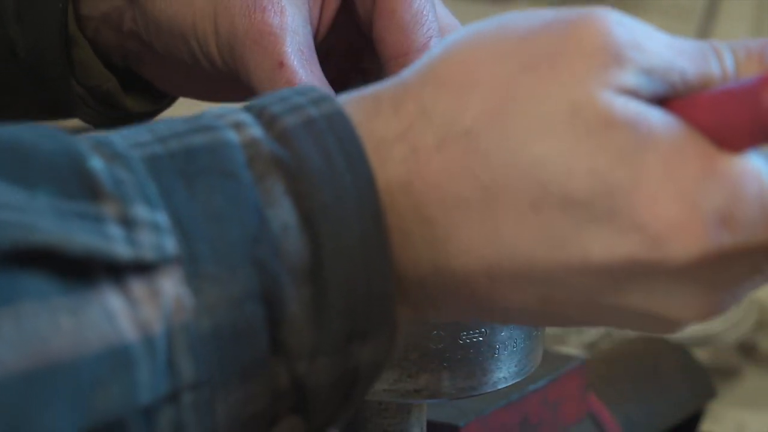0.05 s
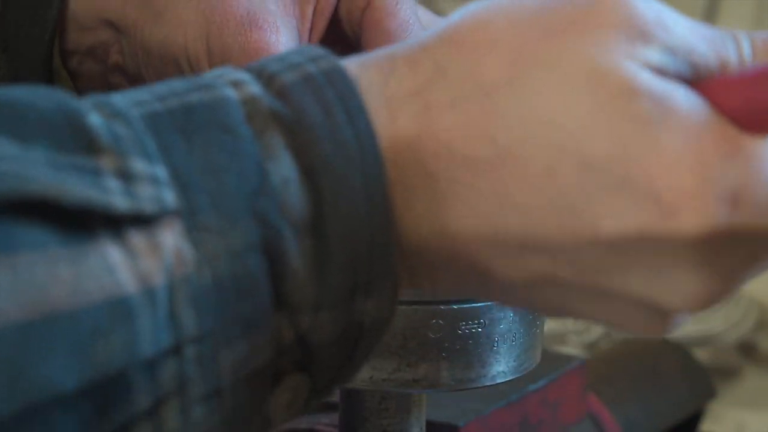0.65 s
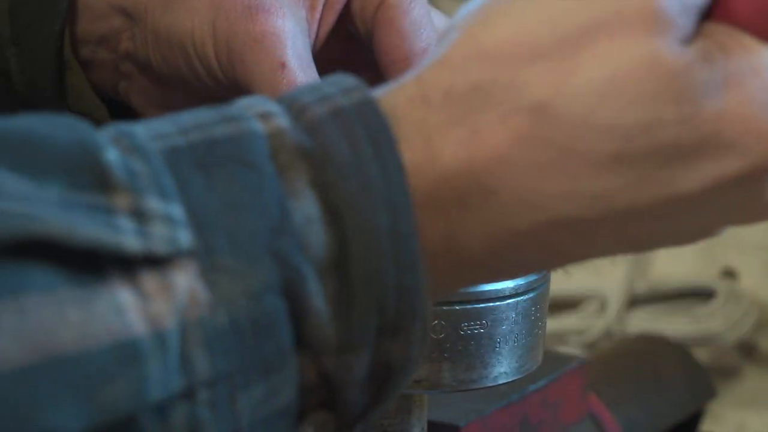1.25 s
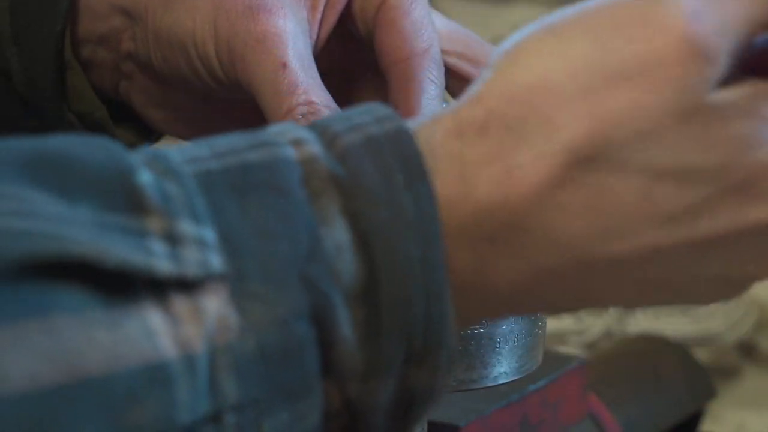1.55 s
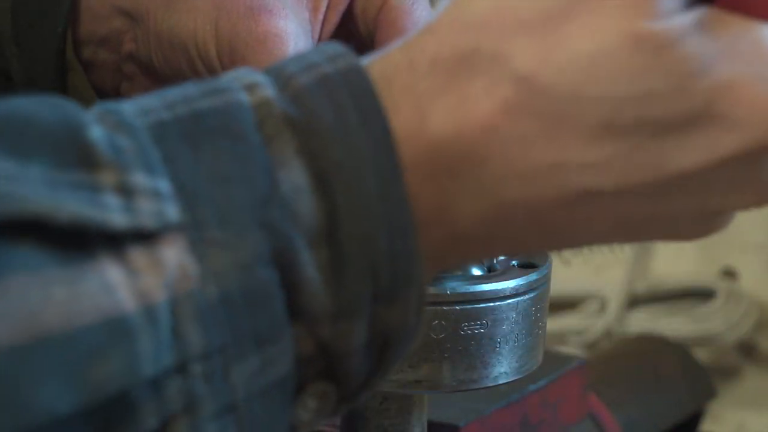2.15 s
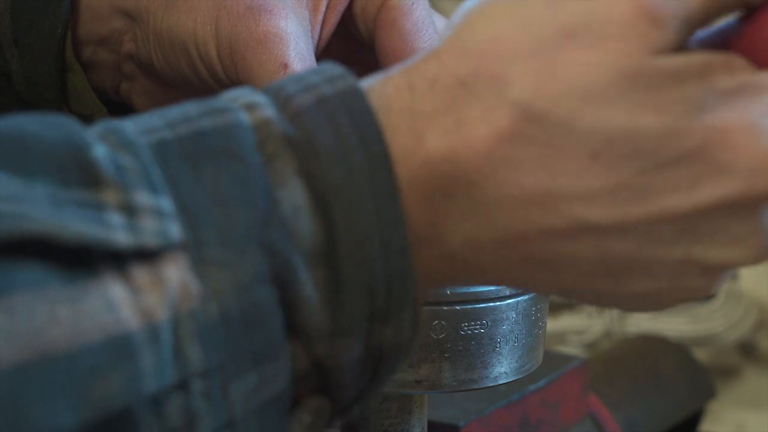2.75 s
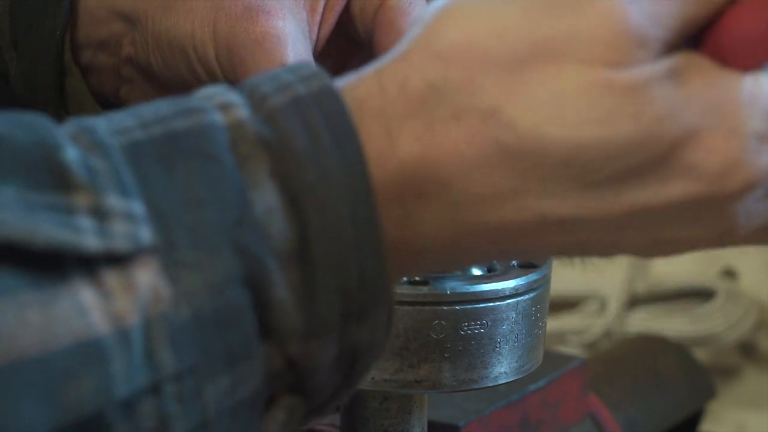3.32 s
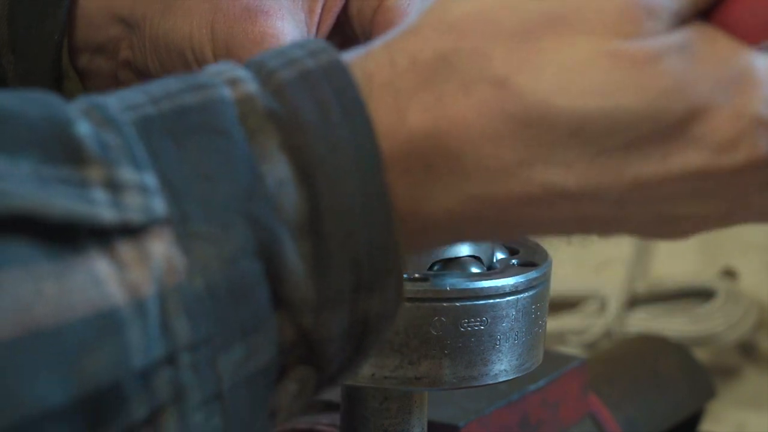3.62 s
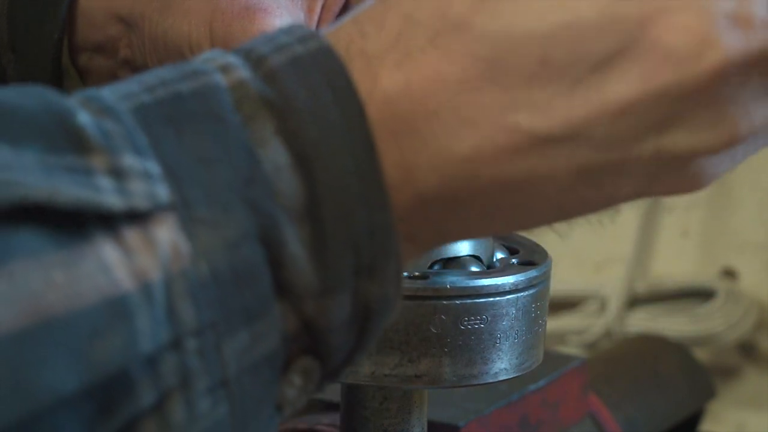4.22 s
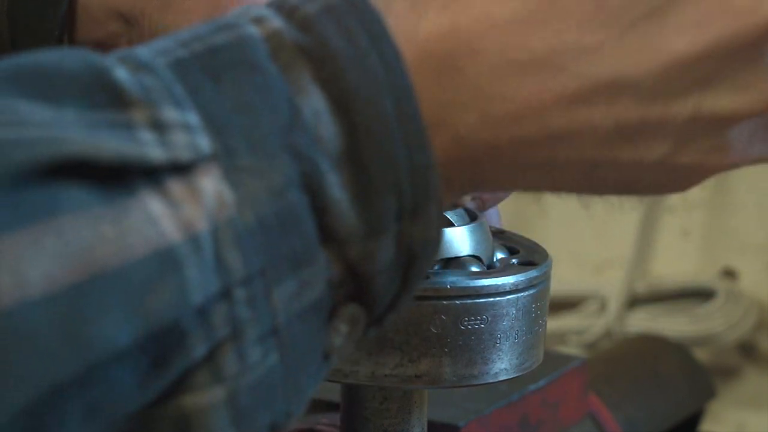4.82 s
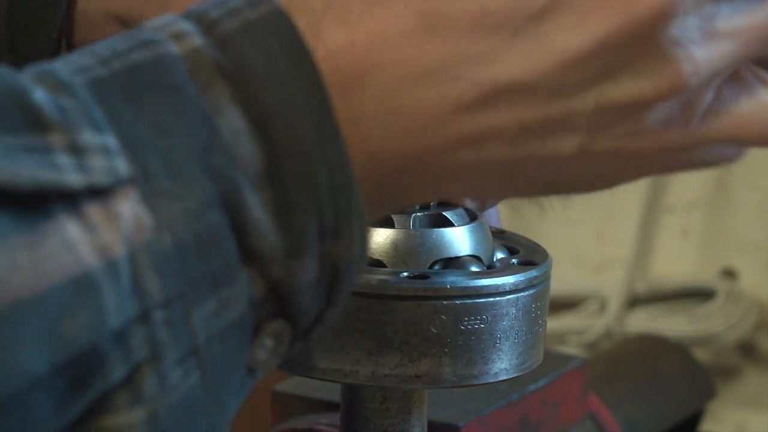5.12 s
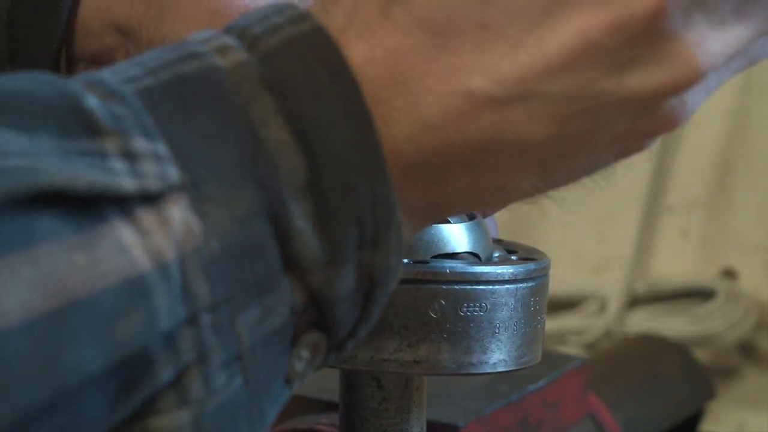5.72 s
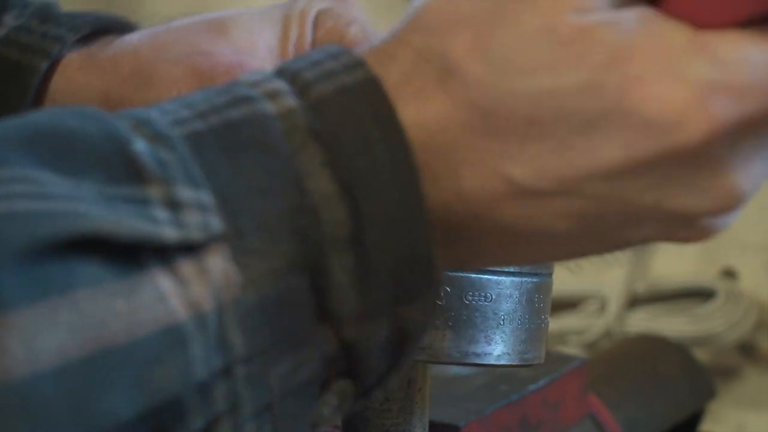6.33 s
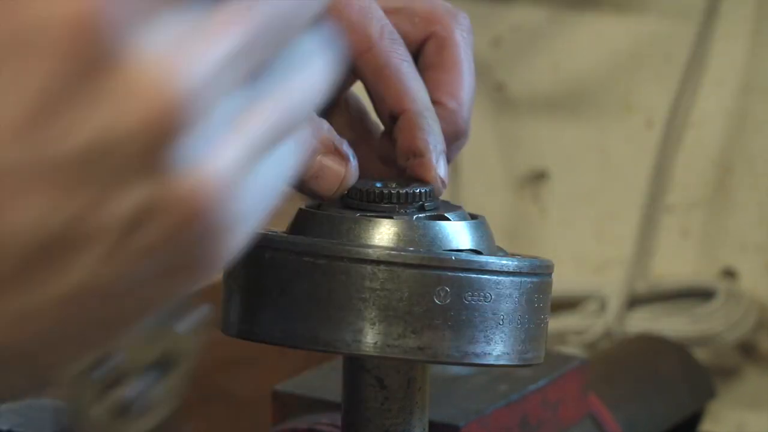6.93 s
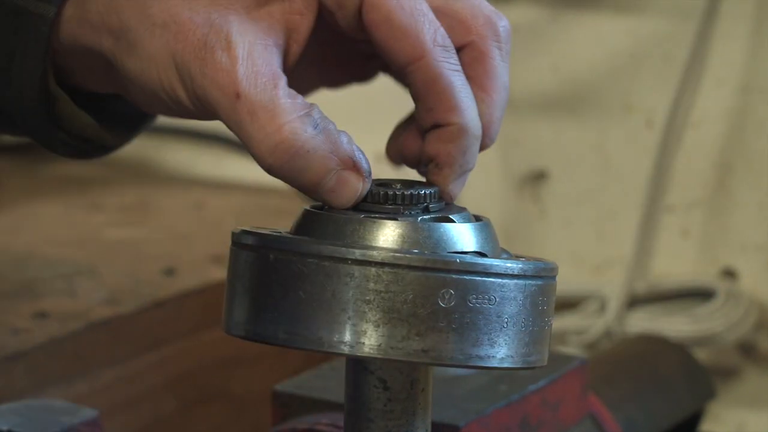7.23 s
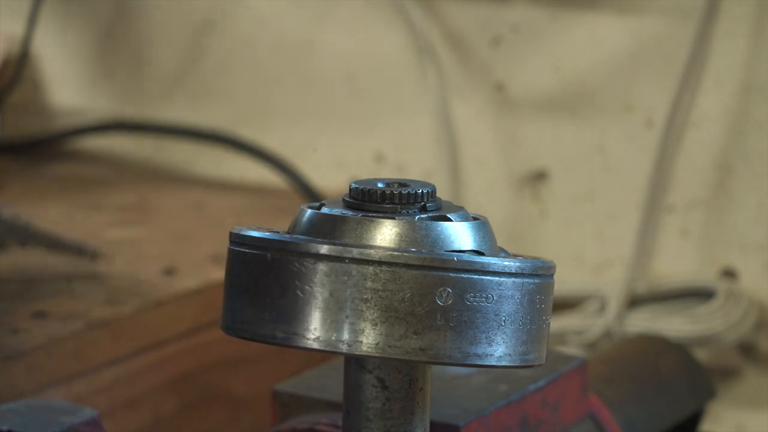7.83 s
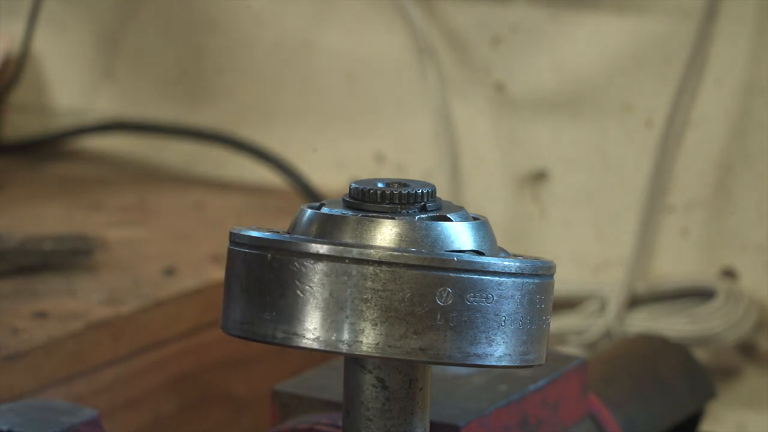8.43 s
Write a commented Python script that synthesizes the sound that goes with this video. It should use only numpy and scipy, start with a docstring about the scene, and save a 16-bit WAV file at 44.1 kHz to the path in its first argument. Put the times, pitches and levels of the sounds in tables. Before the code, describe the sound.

Pliers work small steel clips onto a metal axle, their tips clicking, slipping and ticking at irregular intervals. A clip snaps free with a brief high ring near the start, and a second snaps louder later on. A sleeve then swishes and the pliers clatter down on a wooden bench. The sounds are close, in a small quiet workshop with a faint electrical hum.

```python
"""Circlip pliers at a workbench

Pliers work small steel circlips onto the axle of a hub held in a vice. The tips click and slip on the
steel; twice a circlip snaps free and rings. A sleeve swishes as the arm draws back, and the pliers
clatter down on the wooden bench. A faint hum fills the quiet workshop throughout."""
import sys
import numpy as np
from scipy import signal
from scipy.io import wavfile
from scipy.ndimage import uniform_filter1d

SR = 44100
rng = np.random.default_rng(int(sys.argv[2]) if len(sys.argv) > 2 else 0)


def int16_out(signal):
    """Quantize to a 16-bit WAV file."""
    q = np.round(np.clip(np.atleast_2d(signal).T, -1, 1) * 32767)
    wavfile.write(sys.argv[1], SR, q.astype(np.int16))


N = 377937


def amp(db):
    """Decibels to gain."""
    return 10 ** (np.asarray(db) / 20)


def unit_rms(x):
    """Scales to rms 1."""
    return x / np.sqrt(np.mean(x ** 2) + 1e-20)


def lookup(table, hz):
    """Interpolates a table over log frequency."""
    f, value = np.transpose(table)
    return np.interp(np.log(hz + 1), np.log(f), value)


def add(mix, start_s, sound):
    """Mixes a sound in at start_s."""
    part = mix[max(round(start_s * SR), 0):][:len(sound)]
    part += sound[:len(part)]


def colour(x, spectrum, peaks=(), size=4096):
    """Minimum-phase filter: a broad spectrum plus peaks (f/Hz, width/Hz, height/dB)."""
    hz = abs(np.fft.fftfreq(size, 1 / SR))
    peaks_db = sum(height / (1 + (2 * (hz - f) / width) ** 2) for f, width, height in peaks)
    log_gain = np.log(amp(lookup(spectrum, hz) + peaks_db))
    taps = np.fft.ifft(np.exp(signal.hilbert(log_gain).conj())).real
    return signal.oaconvolve(x, taps[:size // 2])[:len(x)]


def blow_level(x, db):
    """Gives a blow the energy of 10 ms at rms level db."""
    return amp(db) * x * np.sqrt(SR / 100 / np.sum(x ** 2))


def part_level(blow_db, base_db, growth, usual_db=-44.5):
    """Level of one part of a blow: base_db at usual_db, plus growth dB for each dB above."""
    return base_db + growth * (blow_db - usual_db)


def burst(db, spectrum, peaks=(), *, rise_s, t60_s, size=16384):
    """Many close modes, struck: noise that swells quickly and dies away."""
    t = np.arange(size) / SR
    envelope = (1 - np.exp(-t / rise_s)) * amp(-60 * t / t60_s)
    noise = rng.choice([-1., 1.], size)
    return blow_level(colour(noise * envelope, spectrum, peaks), db)


# air spectrum: f/Hz, level/dB
AIR = [(25, -21.5), (50, -4), (110, 2), (200, -5), (320, -5.5), (600, -9.5), (1000, -12.5), (2000, -18.5),
       (4000, -20), (8000, -23), (15000, -24)]
# mains partials: f/Hz, level/dB
HUM = [(60, -81.5), (120, -68.5)]

def background(air_db=-60.5, air_waver_db=.5, hum_waver_db=2.1):
    """Still air and a faint mains hum, wavering together."""
    t = np.arange(N) / SR
    waver = unit_rms(uniform_filter1d(uniform_filter1d(rng.standard_normal(N), 6000), 6000))
    hum = sum(amp(db) * np.sqrt(2) * np.sin(2 * np.pi * (hz * t + rng.random())) for hz, db in HUM)
    air = unit_rms(colour(rng.standard_normal(N), AIR))
    return air * amp(air_db + air_waver_db * waver) + hum * amp(hum_waver_db * waver)


# room decay: f/Hz, t60/s
TAIL_T60 = [(100, .42), (260, .38), (700, .34), (1800, .37), (4500, .44), (9000, .37), (12000, .28),
            (15000, .22)]
# tail spectrum: f/Hz, level/dB
TAIL_COLOUR = [(100, 7), (220, 4.5), (600, -0.5), (2000, -2.5), (4500, -4), (9000, -6.5), (16000, -5.5)]

def room_response(early_db=-12.5, early_t60_s=.12, echoes_per_s=4000, tail_db=-17.5):
    """Quick reflections off bench and wall, then the tail of a small room."""
    t = np.arange(SR) / SR
    echoes = rng.standard_normal(SR) * (rng.random(SR) < echoes_per_s / SR)
    early = echoes * (t > .0045) * amp(-60 * t / early_t60_s)
    diffuse = rng.standard_normal(SR) * (1 - np.exp(-t / .028))
    hz, age_s, bins = signal.stft(diffuse, SR, nperseg=256)
    decay_db = lookup(TAIL_COLOUR, hz)[:, None] - 60 * age_s / lookup(TAIL_T60, hz)[:, None]
    tail = signal.istft(bins * amp(decay_db), SR, nperseg=256)[1][:SR]
    return amp(early_db) * early / np.linalg.norm(early) + amp(tail_db) * tail / np.linalg.norm(tail)


def workshop(x, count=4):
    """Room responses crossfade in a 1 s cycle, so each click's tail has a slightly different colour."""
    t = np.arange(N) / SR
    shares = [np.maximum(np.cos(2 * np.pi * (t - k / count)), 0) for k in range(count)]
    return x + sum(signal.oaconvolve(x * share, room_response())[:N] for share in shares)


# strokes of sleeve, fingers and sliding pliers: peak t/s, swell/s, fade/s, rustle/dB, swish/dB
STROKES = [(1.75, 1, 0.7, -63, -67), (2.74, 0.37, .12, -63, -61), (4.76, 0.45, 0.13, -59.5, -61),
           (6.93, 0.59, 1, -53.5, -57.5), (7.333, .03, 0.022, -49, -48.5), (7.448, 0.22, 0.33, -48.5, -49),
           (7.56, 0.022, 0.019, -44.5, -74), (7.606, 0.0052, 0.041, -35, -43),
           (7.685, 0.12, 0.072, -37.5, -32.5), (7.84, 0.53, 0.55, -51.5, -53.5)]
# low and high friction spectra: f/Hz, level/dB
RUSTLE = [(100, -14), (230, -6), (370, 2), (800, -0.5), (1500, -1), (2200, -5.5), (4000, -21.5)]
SWISH = [(1300, -11.5), (2300, -8.5), (3300, -4.5), (4300, -6.5), (5200, -6), (6800, -7), (9200, -19.5),
         (15000, -29)]

def rubbing(depth_db=18.5, rustle_trim_db=-1, swish_trim_db=-3.5, fizz_db=-5, knee_db=-53,
            catches_per_s=240):
    """Fibres and skin catch and let go; strokes swell and fade, their fizz levelling off at a knee."""
    t = np.arange(N) / SR
    catches = 3 * rng.standard_normal(N) * (rng.random(N) < catches_per_s / SR)
    rustle = unit_rms(colour(rng.standard_normal(N) + catches, RUSTLE, [(774, 820, 2.8)]))
    swish = unit_rms(colour(rng.standard_normal(N) + catches, SWISH, [(4270, 800, 4.5)]))
    fizz = unit_rms(np.diff(rng.standard_normal(N) + catches, prepend=0))
    rustle_power, swish_power = np.zeros(N), np.zeros(N)
    for peak_s, swell_s, fade_s, rustle_db, swish_db in STROKES:
        stroke = amp(-depth_db * np.maximum((peak_s - t) / swell_s, (t - peak_s) / fade_s))
        rustle_power += (stroke * amp(rustle_db + rustle_trim_db)) ** 2
        swish_power += (stroke * amp(swish_db + swish_trim_db)) ** 2
    swish_gain = np.sqrt(swish_power)
    fizz_gain = amp(fizz_db) * np.minimum(swish_gain, amp(knee_db))
    return rustle * np.sqrt(rustle_power) + swish * swish_gain + fizz * fizz_gain


# fingertips on the hub: t/s, length/s, level/dB, starting f/Hz
DRAGS = [(6.905, 0.064, -46, 584), (6.988, .045, -50.5, 685)]

def finger_drags(glide_hz_per_s=4400, width_hz=260):
    """Skin sliding on steel gives a soft, fuzzy, rising squeak."""
    out = np.zeros(N)
    pole = np.exp(-np.pi * width_hz / SR)
    for at_s, length_s, db, hz in DRAGS:
        t = np.arange(0, length_s, 1 / SR)
        noise = rng.standard_normal((SR, 2)) @ [1, 1j]
        fuzz = signal.lfilter([1], [1, -2 * pole, pole * pole], noise)[-len(t):]
        phase = 2 * np.pi * np.cumsum(hz + glide_hz_per_s * t) / SR
        squeak = unit_rms((fuzz * np.exp(1j * phase)).real)
        add(out, at_s, amp(db) * squeak * np.sin(np.pi * t / length_s))
    return out


# spectra of wooden knock, low boom and steel clack, tick and shimmer: f/Hz, level/dB
WOOD = [(120, -21.5), (300, 4.5), (520, 8.5), (900, 9.5), (1450, 5.5), (1750, -3.5), (2400, -5),
        (4500, -41.5)]
BOOM = [(45, -38.5), (76, -11.5), (105, 4.5), (190, 1), (290, -4), (400, -4), (650, -35)]
CLACK = [(1100, -28), (2100, -5), (3200, -2.5), (4500, -1), (5800, 0), (6600, -5), (8800, -30)]
TICK = [(4000, -20.5), (6400, 4.5), (8600, 8), (10600, 3.5), (13200, 3), (15600, -7.5), (17000, -19)]
SHIMMER = [(700, -37.5), (1600, -9.5), (2400, -10.5), (3200, 0.5), (4100, -1.5), (6400, -9.5), (9100, -8),
           (11200, -12), (15600, -16.5)]
# resonances of the bench top, and of pliers and hub: f/Hz, width/Hz, height/dB
BENCH_MODES = [(106, 20, 8), (227, 25, 6), (476, 30, 6), (592, 25, 5), (635, 25, 6), (812, 55, 7),
               (916, 45, 5), (1017, 35, 7), (1210, 30, 5), (1360, 140, 4)]
STEEL_MODES = [(1720, 450, 5), (3900, 500, 2.5), (5000, 600, 3.5), (5600, 600, 4), (6850, 500, 2.5),
               (8050, 550, 3), (9350, 600, 5.5), (11750, 900, 3.5)]
# pliers landing and rocking: t/s, wood/dB, thump/dB, clack/dB
KNOCKS = [(7.748, -46, -44, -52), (7.9014, -22.5, -27, -32.5), (8.0352, -21.5, -39, -43.5),
          (8.0455, -20, -26, -35), (8.0692, -28.5, -57, -52), (8.1397, -13.5, -29.5, -31),
          (8.1482, -30, -27, -34.5), (8.2909, -22, -68, -68), (8.3562, -37, -57, -52.5),
          (8.3935, -36, -34, -69), (8.4131, -33.5, -30, -50), (8.4856, -25, -37, -48.5),
          (8.4959, -49, -34, -42)]

def bench_knocks(shudder_db=-7, jaw_ring_db=-11):
    """The pliers drum on the bench top, which shudders on; their jaws rattle and ring."""
    out = np.zeros(N)
    for at_s, wood_db, thump_db, clack_db in KNOCKS:
        tick_db = part_level(clack_db, base_db=-51.5, growth=1.63)
        add(out, at_s, burst(thump_db, BOOM, BENCH_MODES, rise_s=.0013, t60_s=.15))
        add(out, at_s, burst(wood_db, WOOD, BENCH_MODES, rise_s=.00065, t60_s=.042))
        add(out, at_s, burst(wood_db + shudder_db, WOOD, BENCH_MODES, rise_s=.011, t60_s=.41))
        add(out, at_s, burst(clack_db, CLACK, [(2800, 330, 8.5)], rise_s=.00061, t60_s=.02))
        add(out, at_s, burst(clack_db + jaw_ring_db, SHIMMER, rise_s=.0066, t60_s=.32))
        add(out, at_s, burst(tick_db, TICK, STEEL_MODES, rise_s=.0006, t60_s=.016))
    return out


# dull body of a blow on steel: f/Hz, level/dB
BODY = [(160, -24), (370, -1), (850, 0), (1350, -2.5), (1850, -7), (2800, -12), (4500, -32)]
# tips slipping on circlip and axle: t/s, body/dB, clack over body/dB, contact f/Hz
SLIPS = [(0.394, -51, -8, 3950), (0.872, -54.5, 13, 6340), (0.9179, -63.5, 15, 5340),
         (0.9976, -65, 7.5, 5150), (1.2495, -41.5, 1, 5440), (1.2604, -46, -0.5, 9000),
         (1.339, -43.5, 10.5, 8100), (1.3919, -45.5, 1.5, 5110), (1.5442, -59, 9, 7870),
         (1.5965, -44, 6, 1810), (1.7327, -35.5, -5, 1800), (1.7418, -43.5, 4, 1600),
         (1.852, -54.5, 3, 7670), (1.9596, -46.5, 5.5, 5650), (2.1561, -44.5, 3, 8140),
         (2.255, -53, -9, 1620), (2.562, -45.5, 9.5, 7340), (2.6557, -59, 8.5, 3560),
         (2.8209, -38, 1.5, 9300), (2.8291, -35.5, 0.5, 1850), (3.397, -55, -5.5, 1410),
         (3.572, -52, -6.5, 1090), (3.6159, -38, -1, 3960), (3.862, -54.5, -3, 9300), (3.896, -40, 1, 3270),
         (4.1263, -49, -19, 1130), (4.3463, -55, -6.5, 9320), (4.3768, -54.5, 2.5, 2770),
         (5.53, -38.5, -15.5, 1730), (5.604, -31, -9.5, 1580), (5.764, -69, 17, 14000),
         (5.9143, -36.5, -14, 1060), (5.982, -47, -13, 1750), (6.1113, -43.5, -13, 930),
         (6.1244, -46, -7.5, 940), (6.393, -55, 10.5, 6000), (6.5584, -49.5, 14.5, 11510)]

def tip_clicks(lead_s=.0089, scrape_db=-22.5, contact_q=5, contact_db=6.5):
    """Each slip scrapes, ticks and rings the pliers at its own pitch; a low room boom swells after."""
    out = np.zeros(N)
    for at_s, body_db, bright_db, contact_hz in SLIPS:
        clack_db = body_db + bright_db
        boom_db = part_level(body_db, base_db=-44.5, growth=.51)  # grows less than the click
        tick_db = part_level(clack_db, base_db=-45, growth=1.3)  # harder contacts are brighter
        # the contact point decides how each resonance answers
        modes = [(hz * rng.uniform(.96, 1.04), width_hz, db + 1.5 * rng.standard_normal())
                 for hz, width_hz, db in STEEL_MODES]
        modes.append((contact_hz, contact_hz / contact_q, contact_db))
        scrape = burst(body_db + scrape_db, SHIMMER, modes, rise_s=.0062, t60_s=.05, size=4096)
        add(out, at_s - lead_s, scrape)
        add(out, at_s, burst(boom_db, BOOM, rise_s=.0091, t60_s=.16))
        add(out, at_s, burst(body_db, BODY, modes, rise_s=.00032, t60_s=.065, size=4096))
        add(out, at_s, burst(clack_db, CLACK, modes, rise_s=.00012, t60_s=.026, size=4096))
        add(out, at_s, burst(tick_db, TICK, modes, rise_s=.00018, t60_s=.026, size=4096))
    return out


def tip_skids(count=3, within_s=.11, below_db=14, spread_db=5, boom_offset_db=1.5):
    """After a slip the tips skid on in tiny ticks, each with a faint room boom."""
    out = np.zeros(N)
    for slip_s, body_db, bright_db, _ in SLIPS:
        for wait, strength in rng.random((count, 2)):
            at_s = slip_s + within_s * wait
            db = body_db + min(bright_db, 0) - below_db + spread_db * np.log(strength)
            add(out, at_s, burst(db, TICK, STEEL_MODES, rise_s=.0001, t60_s=.012, size=2048))
            add(out, at_s, burst(db + boom_offset_db, BOOM, rise_s=.012, t60_s=.14, size=8192))
    return out


# modes of each circlip: f/Hz, level/dB, t60/s
FIRST_RING = [(3625, -5, .42), (3772, -2, .48), (3805, -5, .45), (4454, -4, .4), (5355, -4, .33),
              (6661, -6, .33), (7962, -4, .3), (9345, -1, .33), (10200, -4, .34), (11720, -8, .26)]
SECOND_RING = [(3850, -8, .45), (3934, -10, .47), (5009, -3, .44), (5050, -5, .44), (5073, -4, .44),
               (5100, -4, .44), (5145, -4, .4), (5215, -6, .4), (5371, -3, .33), (5417, 0, .35),
               (5466, -3, .33), (5640, -11, .4), (9426, -16, .3), (11750, -12, .26)]

def circlip_ring(modes, db, max_split_hz=20, size=32768):
    """Free modes of a circlip; its gap splits each into a close, beating pair."""
    t = np.arange(size) / SR
    out = np.zeros(size)
    for hz, mode_db, t60_s in modes:
        phase, twin_phase = 2 * np.pi * rng.random(2)
        twin_hz = hz + rng.uniform(-max_split_hz, max_split_hz)
        pair = np.sin(2 * np.pi * hz * t + phase) + 1.1 * np.sin(2 * np.pi * twin_hz * t + twin_phase)
        out += amp(mode_db - 60 * t / t60_s) * pair
    return blow_level(out, db)


# circlip striking the axle: t/s, clack/dB, tick/dB, hub peak height/dB
STRIKES = [(0.6426, -22, -17.5, 1.5), (0.6452, -22.5, -17.5, 4), (6.1365, -23, -16.5, 1.5),
           (6.141, -10.5, -25.5, 8.5), (6.1446, -20, -38.5, 15.5), (6.1806, -33, -41.5, 17)]
# ring-out of each snap: t/s, room boom/dB, circlip ring/dB, hub shimmer/dB, hub peak height/dB
RING_OUTS = [(0.643, -34, -32.5, -31.5, -6), (6.141, -36.5, -19, -22.5, 7)]

def circlip_snaps(boom_hz=200, hub_hz=5280, body_offset_db=-15.5):
    """A circlip springs off the tips and hits the axle; the room booms, circlip and hub ring on."""
    out = np.zeros(N)
    for at_s, clack_db, tick_db, hub_db in STRIKES:
        add(out, at_s, burst(max(clack_db, tick_db) + body_offset_db, BODY, rise_s=.0001, t60_s=.03))
        add(out, at_s, burst(clack_db, CLACK, [(hub_hz, 1300, hub_db)], rise_s=.00017, t60_s=.0054))
        add(out, at_s, burst(tick_db, TICK, [(10100, 850, 3.2)], rise_s=.00051, t60_s=.0096))
    for (at_s, boom_db, ring_db, shimmer_db, hub_db), modes in zip(RING_OUTS, (FIRST_RING, SECOND_RING)):
        add(out, at_s, burst(boom_db, BOOM, [(boom_hz, 70, 14)], rise_s=.018, t60_s=.17))
        add(out, at_s, circlip_ring(modes, ring_db))
        hub_peak = [(hub_hz, 380, hub_db)]
        add(out, at_s, burst(shimmer_db, SHIMMER, hub_peak, rise_s=.0024, t60_s=.42, size=32768))
    return out


def scene():
    """The handwork in the room, over air and hum; mono."""
    handwork = tip_clicks() + tip_skids() + circlip_snaps() + bench_knocks() + rubbing() + finger_drags()
    return (workshop(handwork) + background())[None]


def record(dry, ceiling=.85, cutoff_hz=16000):
    """The hardest snaps overload at the ceiling; a low-pass follows."""
    lowpass = signal.firwin(301, cutoff_hz, window=("kaiser", 9), fs=SR)
    return signal.oaconvolve(np.clip(dry, -ceiling, ceiling), lowpass[None], "same")


dry = scene()
out = record(dry)
int16_out(out)
```